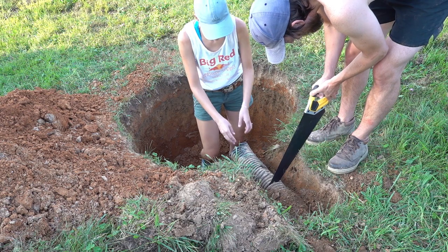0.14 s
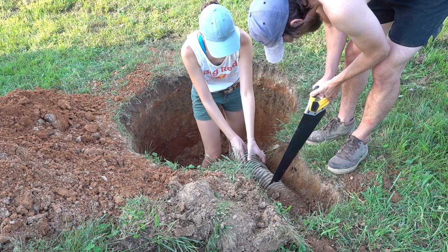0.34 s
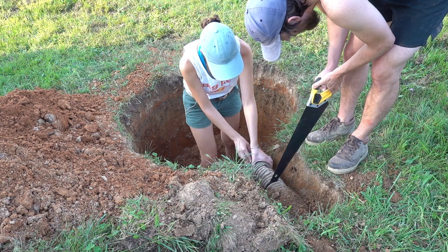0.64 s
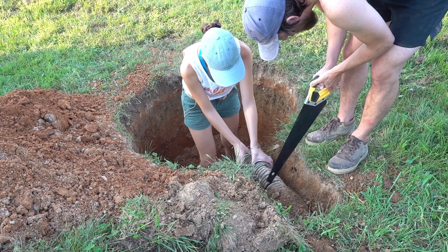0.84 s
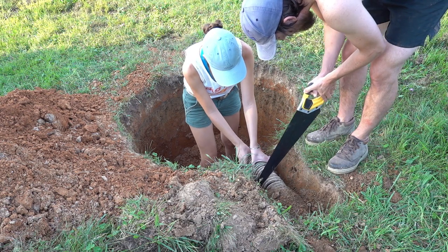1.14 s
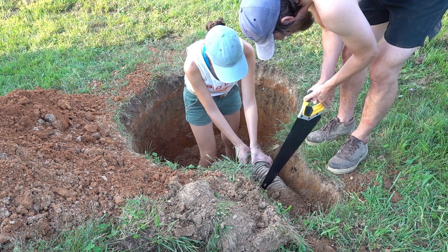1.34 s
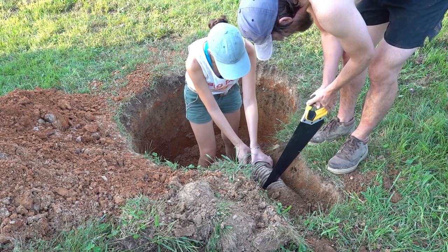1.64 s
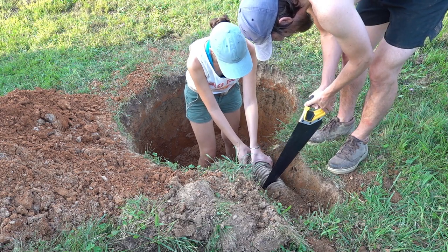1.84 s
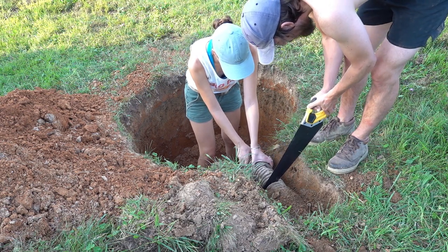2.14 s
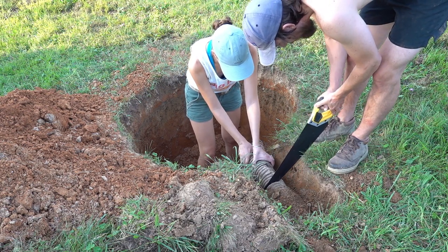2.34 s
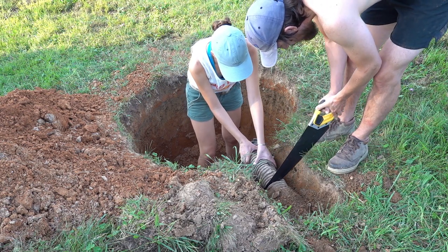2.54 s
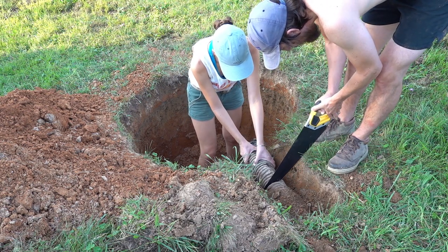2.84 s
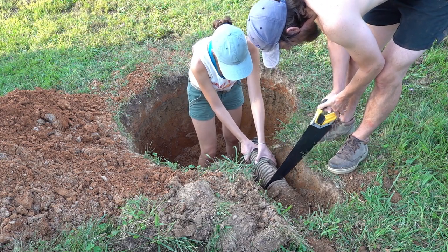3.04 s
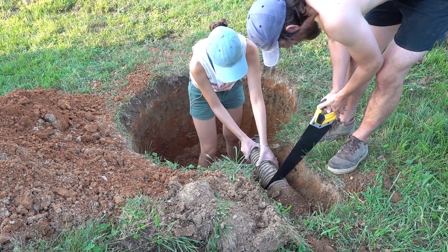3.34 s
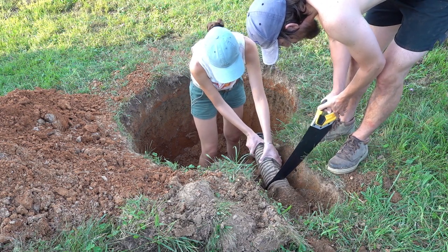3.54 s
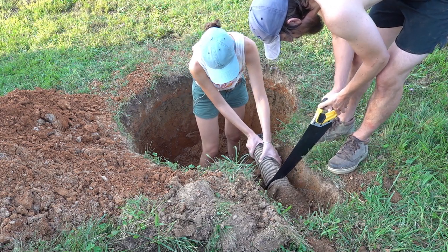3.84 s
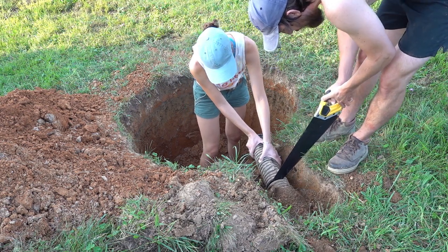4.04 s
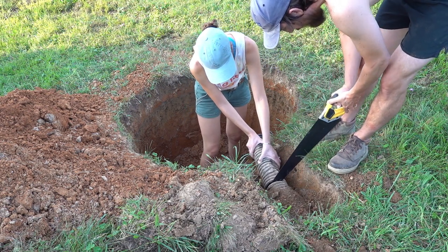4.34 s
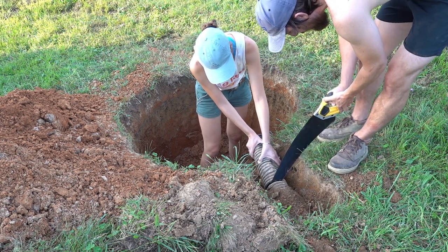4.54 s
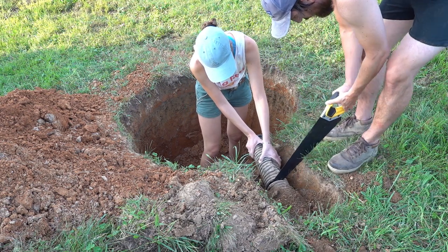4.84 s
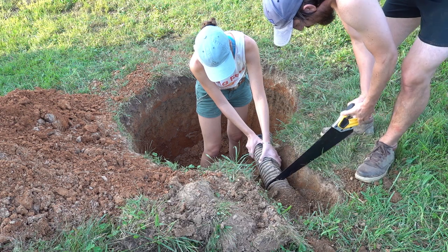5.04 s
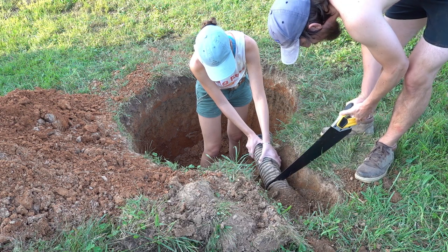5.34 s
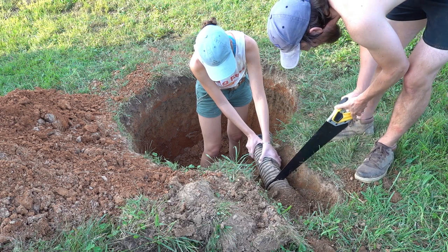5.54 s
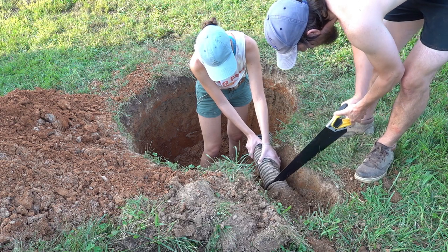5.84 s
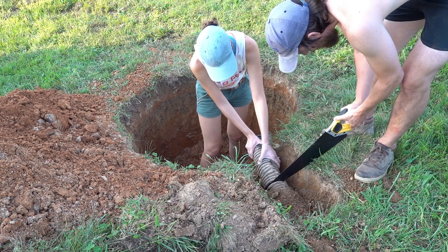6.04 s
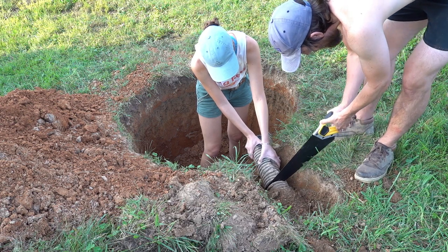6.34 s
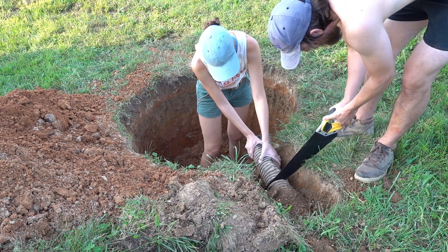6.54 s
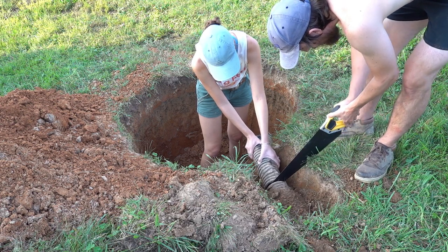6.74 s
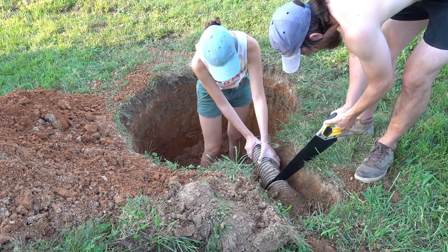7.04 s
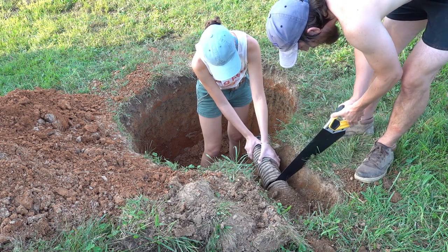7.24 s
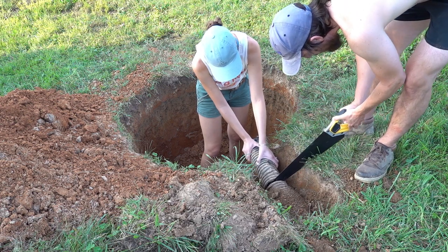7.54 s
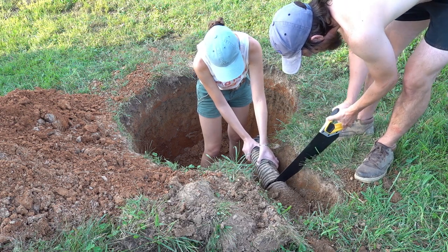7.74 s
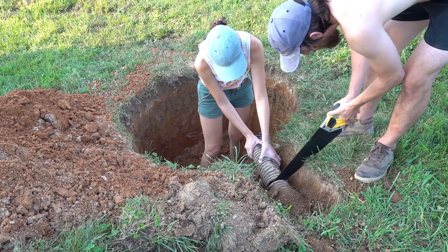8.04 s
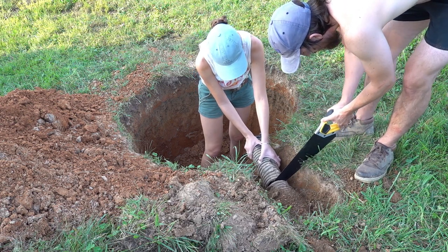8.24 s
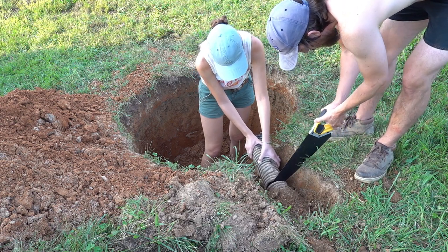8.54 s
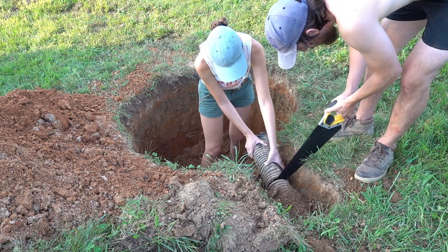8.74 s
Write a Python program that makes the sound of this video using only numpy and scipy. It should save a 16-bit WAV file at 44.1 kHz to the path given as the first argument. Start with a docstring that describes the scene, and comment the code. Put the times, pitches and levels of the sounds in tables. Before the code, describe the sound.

A steady high shimmer of insects and soft open air fills a lawn, with a fading wind gust at the start. A few faint snags and tiny rasps test a hollow plastic pipe in the first second, joined by light taps. At 1.6 and especially 2.0-2.6 seconds, short crackling scrapes, sharp snaps and low hollow knocks cluster together. From 2.7 to 3.8 the free blade taps the ribs, thin and slightly metallic. A hard catch and clack come at 4.0, another at 5.1, with sparse quiet between. Around 5.9 the saw bites strongly; brief coarse rasps then follow every few tenths of a second, with a sharp jam at 6.9. Wind buffets low and strong from about 6.7 to 8.2. The near cricket's fast trill stops around 8.3, as dense, rough strokes and cracks continue to the end, close and dry with a short echo.

```python
"""Insects sing in the lawn and a gust fades as a hand saw tries a corrugated plastic pipe lying in a dug hole.
Short trial strokes come first, among snagging teeth and, later, taps of the free blade on the ribs.
From about six seconds the strokes bite harder and closer together, and gusts swell over them.
Plucks at the rate of the teeth excite a crackling wall and the ringing hollow of the pipe; snags and jams add
single cracks and clacks. Filtered noise makes the wind and air, narrow bands and a gliding tone the insects."""
import sys
import numpy as np
from scipy import signal
from scipy.fft import rfft, irfft
from scipy.io import wavfile
from scipy.ndimage import uniform_filter1d

SR = 44100
rng = np.random.default_rng(int(sys.argv[2]) if len(sys.argv) > 2 else 0)


def master_out(mix):
    """Clip the mix to full scale and print it as 16-bit PCM to the path in sys.argv[1]."""
    frames = np.transpose(np.atleast_2d(mix))
    ceiling = np.clip(frames, -1, 1)
    pcm = np.round(ceiling * 32767).astype(np.int16)
    wavfile.write(sys.argv[1], SR, pcm)


N = 392030
T = np.arange(N) / SR
RING = T[:SR // 3]  # time axis of every ringing response, s


def undb(db):
    """Decibels to gain."""
    return 10 ** (np.asarray(db) / 20)


def unit(x):
    """Scale to rms 1."""
    return x / np.sqrt(np.mean(x ** 2))


def walk(rate):
    """Smooth random wander of spread near 1, with about `rate` new values a second."""
    k = max(int(SR / rate), 1)
    steps = np.repeat(rng.standard_normal(N // k + 1), k)
    return 1.375 * uniform_filter1d(steps, k)[:N]


def through(x, response):
    """Pass a signal through an impulse response, keeping its length."""
    return signal.fftconvolve(x, response)[:len(x)]


def colour(points, size=4096):
    """Causal (minimum-phase) response of unit energy with the shape of a (Hz, dB) spectrum."""
    hz, db = np.transpose(points)
    f = np.maximum(np.fft.rfftfreq(size, 1 / SR), 1)
    gain = undb(np.interp(np.log(f), np.log(hz), db))
    cepstrum = irfft(np.log(gain))
    h = irfft(np.exp(rfft(2 * cepstrum[:size // 2], size)))
    return h / np.linalg.norm(h)


def band(hz, width):
    """Noise in a bell-shaped band, at rms 1."""
    f = np.fft.rfftfreq(N, 1 / SR)
    bell = 1 / (1 + (2 * (f - hz) / width) ** 4)
    return unit(irfft(rfft(rng.standard_normal(N)) * bell, N))


def stereo(a, b, likeness):
    """Two unrelated signals as mid and side; likeness is the left-right correlation."""
    c = np.clip(likeness, -1, 1)
    return np.sqrt((1 + c) / 2) * a + np.sqrt((1 - c) / 2) * np.array([b, -b])


def fade(t60):
    """Exponential decay by 60 dB in t60 seconds."""
    return np.exp(-np.log(1000) * RING / t60)


def modes(table):
    """Response of unit energy of a set of ringing modes (Hz, t60 s, dB)."""
    h = sum(undb(db) * fade(t60) * np.sin(2 * np.pi * hz * RING) for hz, t60, db in table)
    return h / np.linalg.norm(h)


def scatter(t60):
    """Dense decaying echoes of unit energy."""
    h = rng.standard_normal(len(RING)) * fade(t60)
    return h / np.linalg.norm(h)


def resonate(x, hz, q):
    """One broad resonance, gain 1 at its centre."""
    return signal.lfilter(*signal.iirpeak(hz, q, fs=SR), x)


def add(track, s, sound):
    """Mix a sound in at time s."""
    i = max(int(s * SR), 0)
    track[i:i + len(sound)] += sound[:max(N - i, 0)]


def swells(rows, rise_s, fall_s):
    """Strength over time of (start, end, dB) bouts: each rises in rise_s, holds and dies away."""
    bouts = []
    for start, end, db in rows:
        rise = np.clip((T - start) / rise_s, 0, 1)
        fall = np.exp(-np.maximum(T - end, 0) / fall_s)  # fall_s is a time constant
        bouts.append(undb(db) * rise * fall)
    return np.max(bouts, axis=0)


def lawn(air_db=-50.0, buzz_hz=54.2, buzz_depth=.9):
    """Open air is coloured noise, far choruses are noise bands, a katydid is high noise beaten by its wings."""
    # spectrum of the open air: pitch_hz, level_db (relative)
    air_colour = [(30, 13.5), (150, -13.5), (350, -6.5), (700, -5), (1300, -11.5), (2200, -17.5),
                  (5500, -18.5), (10000, -22), (13500, -17.5), (16000, -17)]
    # distant insect choruses: pitch_hz, width_hz, level_db (before swelling), left-right likeness (-1 to 1)
    choruses = [(4490, 500, -63, -0.26), (7020, 800, -54.5, -0.56), (7720, 330, -57.5, -0.44),
                (8480, 1700, -58, -0.61)]
    # bouts of a high buzzing katydid: start_s, end_s, level_db (held)
    katydid_bouts = [(1.0, 3.8, -55), (5, 6.0, -59.5), (8.5, 8.9, -50)]
    mid, side = (through(rng.standard_normal(N), colour(air_colour)) for _ in range(2))
    waver = undb(.7 * walk(5))
    out = stereo(mid, side, likeness=0.48) * undb(air_db) * waver
    for hz, width, db, likeness in choruses:
        swell = undb(1.3 * walk(14) + .7 * walk(3))
        out += stereo(band(hz, width), band(hz, width), likeness) * undb(db) * swell
    drift = 1 + .008 * walk(5)
    wings = 1 + buzz_depth * np.sin(2 * np.pi * np.cumsum(buzz_hz * drift) / SR)
    hiss = stereo(band(14730, 1150), band(13300, 1150), likeness=0.14)
    return out + hiss * unit(wings) * swells(katydid_bouts, rise_s=0.71, fall_s=0.82)


def cricket(pulse_hz=27.05, tone_hz=7880, arch_hz=330, gate_power=3.2):
    """Each wing stroke of the near cricket is a short tone that rises and falls with the speed of the wing."""
    # bouts of song: start_s, end_s, level_db (before rise and sway)
    song_bouts = [(-1.5, 0.61, -51), (1.63, 8.3, -52)]
    drift = 1 + .01 * walk(6)
    sway_db = .7 * walk(12)
    wing = abs(np.sin(np.pi * np.cumsum(pulse_hz * drift) / SR))
    pitch = tone_hz - arch_hz * (1 - wing) + 35 * walk(500)
    phase = 2 * np.pi * np.cumsum(pitch) / SR
    # it sits off to one side, so the tone meets the two ports out of step
    tones = np.array([np.sin(phase), np.sin(phase + 1.6)])
    chirp = unit(wing ** gate_power * tones)
    return chirp * undb(sway_db) * swells(song_bouts, rise_s=1.8, fall_s=0.063)


def wind(breeze_db=-47.5, wind_db=-2.0, bright_db=-7.0, bright_power=1.22, side_db=-11.5):
    """Eddies thump on the microphone; strong gusts shed smaller, higher-pitched ones; a part differs by port."""
    # gusts on top of the breeze: start_s, end_s, force_db (before the trims of each layer)
    gusts = [(-0.04, .25, -31), (0.71, .94, -37.5), (1.42, 1.49, -33), (1.72, 1.9, -42.5),
             (2.5, 2.85, -47.5), (3.62, 4.22, -42.5), (4.92, 5.14, -33.5), (5.39, 5.49, -33.5),
             (5.85, 6.1, -48), (6.3, 6.48, -52), (6.68, 7.08, -32), (7.06, 7.37, -24.5),
             (7.38, 7.96, -22.5), (8.02, 8.18, -28), (8.3, 8.89, -42.5)]
    # spectrum of the big eddies: pitch_hz, level_db (relative)
    big = [(20, -21.5), (45, -1.5), (80, 2), (130, -0.5), (200, -7.5), (300, -18.5), (500, -34), (900, -52),
           (2000, -61.5)]
    force = undb(breeze_db) + swells(gusts, rise_s=0.043, fall_s=0.042)
    # small eddies, and the part unlike at the two ports: (Hz, relative dB)
    small = [(60, -51), (150, 1.5), (270, 1), (420, -10.5), (650, -22), (900, -36.5), (2000, -65)]
    apart = [(20, 0.5), (60, -5.5), (130, 1.5), (250, -6), (500, -21.0), (2000, -44.5)]
    low, high, side = (unit(through(rng.standard_normal(N), colour(points))) for points in (big, small, apart))
    # big and small eddies come and go on their own
    roll, puff = undb(1.6 * walk(25)), undb(4.5 * walk(32))
    thump = undb(wind_db) * roll * low
    flutter = undb(bright_db) * puff * (force / force.max()) ** bright_power * high
    return force * (thump + flutter + undb(side_db) * roll * np.array([side, -side]))


def hole(x, side_db=-11, echo_t60=0.048, port_lag_s=1.6e-5):
    """The earth walls throw sound back differently to left and right; direct sound meets the right port first."""
    # colour of the echoes: (Hz, relative dB)
    spread = [(100, 3), (350, 3), (700, 0), (1200, -5), (2500, -11), (4500, 1), (8000, 1), (13000, 0)]
    echoes = through(scatter(echo_t60), colour(spread))
    side = undb(side_db) * through(x, echoes)
    f = np.fft.rfftfreq(N, 1 / SR)
    late = irfft(rfft(x) * np.exp(-2j * np.pi * f * port_lag_s), N)
    return np.array([late + side, x - side])


def hollow(ribs_db=-2, ribs_t60=0.14):
    """The pipe's response: its main modes, and weaker ones that change with the point of contact."""
    # main modes of hollow and wall: pitch_hz, t60_s, level_db (relative)
    pipe_modes = [(330, 0.11, -57), (336.8, 0.36, -10), (361.4, 0.18, 2), (433, 0.06, 3.5),
                  (453, 0.042, -3), (678, 0.16, -13), (715, 0.1, -11), (848, 0.075, -20),
                  (1065, 0.025, -26), (1540, 0.022, -9), (1666, 0.18, -23)]
    # spectrum of the many weaker wall modes between these: pitch_hz, level_db (relative)
    rib_colour = [(120, -21.5), (230, -11.5), (320, 6.5), (480, -3.5), (580, -8), (760, -10), (1100, -13),
                  (2000, -21), (5000, -52.5)]
    return modes(pipe_modes) + undb(ribs_db) * through(scatter(ribs_t60), colour(rib_colour))


def wall(spectrum, crack_db, crack_t60, tail_db, tail_t60):
    """The plucked wall: a sharp tick, a crack running along the ribs, a longer tail from the hole."""
    h = undb(crack_db) * scatter(crack_t60) + undb(tail_db) * scatter(tail_t60)
    h[0] += 1
    return through(h / np.linalg.norm(h), colour(spectrum))


def blows(table, tick_db, boom_db, blade_db):
    """Single contacts crack the wall, thump the pipe and set the blade ringing."""
    # modes of the steel blade: pitch_hz, t60_s, level_db (relative)
    blade_modes = [(2430, 0.12, -8), (2700, 0.29, 14), (3110, 0.35, 11), (3500, .05, -20), (6150, .06, -6),
                   (7000, .05, 1)]
    # spectrum of the crack: pitch_hz, level_db (relative)
    crack_colour = [(200, -19.5), (600, 2), (1400, 3), (2000, -4.5), (2700, 6), (4000, 3), (5000, -0.5),
                    (6200, 2), (8300, -1.5), (9800, -8), (16000, -6.5)]
    out, blade = np.zeros(N), modes(blade_modes)
    for s, crack_level_db, hollow_db in table:
        crack = wall(crack_colour, crack_db=10, crack_t60=.011, tail_db=6, tail_t60=.06)
        tick = undb(crack_level_db + tick_db) * (crack + undb(blade_db) * blade)
        pipe = hollow()
        boom = undb(hollow_db + boom_db) * pipe / abs(pipe).max()
        add(out, s, tick + boom)
    return out


def taps():
    """The free blade taps the ribs and rings on."""
    # contacts: start_s, crack_db (before tick_db), pipe boom_db (before the trim below)
    contacts = [(0.8237, -43, -50), (0.9272, -43, -39), (1.3696, -41, -41), (1.4703, -39, -52),
                (1.9781, -50, -37), (2.0322, -53, -33), (2.6906, -22, -29), (2.7617, -22.5, -36.5),
                (3.0053, -22, -36.5), (3.242, -37, -34), (3.3755, -31.5, -48), (3.5144, -37, -34.5),
                (3.6044, -19, -30), (3.6842, -28.5, -50), (3.7474, -24.5, -42), (4.2987, -36, -47),
                (5.6126, -29.5, -57)]
    return blows(contacts, tick_db=15.5, boom_db=2.5, blade_db=-17)


def knocks(clack_q=1.9, clack_t60=0.026):
    """A jammed blade shoves the wall, which answers with a short clack."""
    # jams: start_s, peak_db, clack pitch_hz
    jams = [(2.486, -20, 1090), (4.036, -23, 780), (5.072, -16.5, 780), (6.891, -10.5, 2900),
            (8.826, -13.5, 3300)]
    out = np.zeros(N)
    for s, peak_db, hz in jams:
        clack = scatter(clack_t60)
        for _ in range(2):
            clack = resonate(clack, hz, clack_q)
        add(out, s, undb(peak_db) * clack / abs(clack).max())
    return out


def snaps():
    """Teeth snag and snap free; pinched in the cut, the blade hardly rings."""
    # snags: start_s, crack_db (before tick_db), pipe boom_db (before the trim below)
    snags = [(0.0798, -26.5, -38), (0.2184, -26.5, -54), (0.4252, -26.5, -54), (1.5659, -31.5, -36),
             (1.6033, -15, -30), (2.0729, -24, -22), (2.1027, -26, -16.5), (2.2146, -18, -28),
             (2.2801, -13, -20.5), (2.4712, -10.5, -16), (2.4868, -6.5, -22), (2.539, -17.5, -45),
             (2.9288, -21.5, -30), (4.0357, -11, -10.5), (4.0628, -10.5, -40), (4.6858, -23, -37.5),
             (5.0724, -12, -15.5), (5.889, -9.5, -19), (5.916, -11, -13.5), (5.9359, -18, -20),
             (5.9647, -7.5, -13.5), (6.1574, -28, -37), (6.2066, -11.5, -16), (6.2312, -11, -36),
             (6.2465, -21.5, -10.5), (6.6015, -23.5, -31), (6.7184, -21, -35), (6.8471, -22, -28),
             (6.8911, -12.5, -13.5), (6.9783, -16.5, -13), (7.0954, -23, -44), (7.3655, -20.5, -40),
             (7.5578, -23.5, -23.5), (7.6648, -23, -22), (8.003, -17.5, -17), (8.1761, -18, -11.5),
             (8.2394, -19.5, -47), (8.2882, -19.5, -27), (8.3467, -27.5, -28), (8.3894, -14, -16),
             (8.5415, -17.5, -17), (8.611, -19, -35), (8.6518, -17.5, -39), (8.741, -13, -39),
             (8.8274, -11, -20)]
    return blows(snags, tick_db=11.5, boom_db=-1.5, blade_db=-30)


def arm_speed(share, fastest, power=0.97):
    """The arm speeds up from rest to 1 and slows to rest again in the course of a stroke."""
    turn = np.interp(share, [0, np.clip(fastest, .02, .98), 1], [0, .5, 1])
    return abs(np.sin(np.pi * turn)) ** power  # above 1 the arm dwells less at full speed


def sawing(slow_hz=140, fast_hz=300, jitter=.25, bite_db=5, scrape_db=-8, rasp_db=-0.46, boom_db=-1,
           rasp_stall_db=-10.5, boom_stall_db=-9, lip_db=-2, lip_q=2.1):
    """Teeth pluck the wall at a rate and strength that follow the arm's speed, over the scrape of the blade."""
    # strokes: start_s, length_s, level_db (before rasp_db and boom_db),
    # pipe boom_db (added to the level), share of the stroke at which the arm is fastest (0 to 1)
    strokes = [(0.409, 0.072, -51.5, 1.5, 0.24), (0.59, 0.089, -43, 13, 0.43),
               (0.927, 0.042, -53.5, -9, 0.35), (1.389, 0.039, -49.5, 16, 0.57),
               (1.602, 0.074, -39.5, 6.5, 0.32), (2.078, 0.047, -38.5, 1, 0.56),
               (2.165, 0.059, -39, 14, 0.31), (2.284, 0.099, -39.5, 14, 0.59),
               (2.423, 0.07, -34.5, 12.5, .6), (2.527, 0.064, -41.5, 7, 0.17),
               (3.342, 0.13, -50, -5.5, 0.45), (4.035, 0.077, -33, 11, .35), (4.114, 0.042, -35, 7, 0.46),
               (4.508, 0.15, -51.5, -8, 0.35), (5.075, 0.031, -36.5, -1, 0.13), (5.886, 0.094, -28, 4, .7),
               (6.19, 0.15, -29, 8, .42), (6.616, .11, -33.5, 10, 0.31), (6.89, 0.11, -29, 7, 0.44),
               (7.159, 0.11, -36, 11, 0.4), (7.557, 0.031, -42, 5, 0.45), (7.776, .11, -35, 7.5, 0.34),
               (7.995, .1, -39, 9, 0.24), (8.171, 0.07, -28.5, 10, 0.43), (8.374, 0.079, -31.5, 5, .17),
               (8.536, 0.086, -31.5, 8, 0.35), (8.729, 0.081, -25.5, 8, .6)]
    # spectrum of the rasp: pitch_hz, level_db (relative)
    rasp_colour = [(200, -18.5), (500, 2), (1000, -1.5), (1500, -4.5), (2050, -7.5), (2600, 1.5),
                   (3600, -1), (5000, -3.5), (8000, -7.5), (9500, -10), (13000, -11), (16000, -20)]
    # the lip of the cut rings at a pitch that changes as the slot grows: time_s, pitch_hz
    lip_pitch = [(0, 3360), (2.3, 2420), (4.1, 2860), (6.2, 2670), (7.2, 2970), (7.8, 3550), (8.4, 3350),
                 (8.8, 3260)]
    out = np.zeros(N)
    for start, length, level_db, hollow_db, fastest in strokes:
        t = np.arange(0, length, 1 / SR)
        speed = arm_speed(t / length, fastest)
        chance = rng.standard_normal((200, 2))
        travel = np.cumsum(slow_hz + (fast_hz - slow_hz) * speed) / SR  # in teeth
        # each tooth sticks for its own time and bites to its own depth, softly limited
        tooth = np.searchsorted(np.cumsum(np.exp(jitter * chance[:, 0])), travel)
        slip = np.diff(tooth, prepend=-1)
        bite = undb(bite_db * 2 * np.tanh(chance[tooth, 1] / 2))
        scrape = rng.standard_normal(len(RING))[:len(t)]
        pluck = unit(slip * bite) + undb(scrape_db) * unit(bite * scrape)
        # the whole pipe is dragged by many teeth at once, so more evenly
        drag = (unit(slip) + scrape / 2) * np.sqrt(np.clip(4 * speed, 0, 1))
        crackle = wall(rasp_colour, crack_db=5, crack_t60=.008, tail_db=0, tail_t60=.08)
        lip_hz = np.interp(start, *np.transpose(lip_pitch))
        crackle += undb(lip_db) * resonate(crackle, lip_hz, lip_q)
        # wall and hollow each take up their share of the stroke's energy and let it ring out
        wall_part = (pluck, crackle, level_db + rasp_db, rasp_stall_db)
        pipe_part = (drag, hollow(), level_db + hollow_db + boom_db, boom_stall_db)
        for force, response, db, stall_db in (wall_part, pipe_part):
            load = undb(db + stall_db * (1 - speed))  # weaker where the arm turns round
            sound = signal.fftconvolve(force * load, response)
            add(out, start, sound * np.linalg.norm(load) / np.linalg.norm(sound))
    return out


def scene():
    """Insects and wind around, saw and pipe in the hole."""
    background = lawn() + cricket() + wind()
    cut = taps() + knocks() + snaps() + sawing()
    return background + hole(cut)


def record(dry, top_hz=15900):
    """The recorder drops the deepest rumble and cuts the top."""
    dry = signal.sosfilt(signal.butter(2, 20, "high", fs=SR, output="sos"), dry)
    return signal.sosfilt(signal.ellip(10, .2, 70, top_hz, fs=SR, output="sos"), dry)


dry = scene()
out = record(dry)
master_out(out)
```